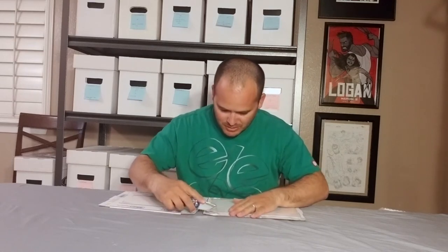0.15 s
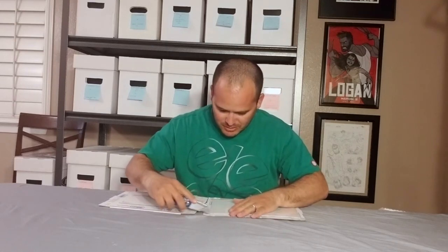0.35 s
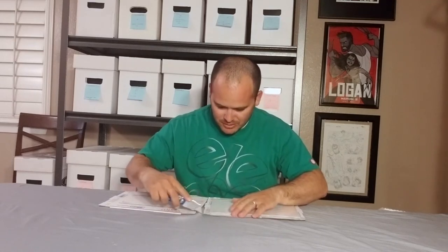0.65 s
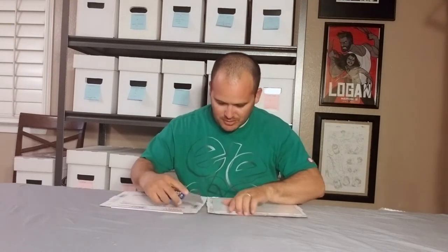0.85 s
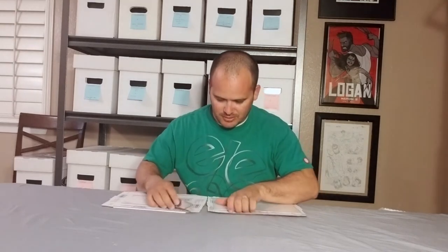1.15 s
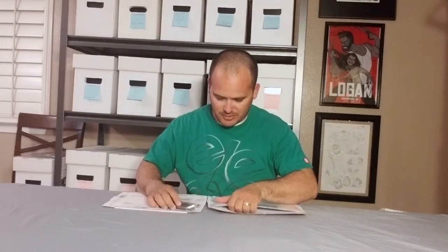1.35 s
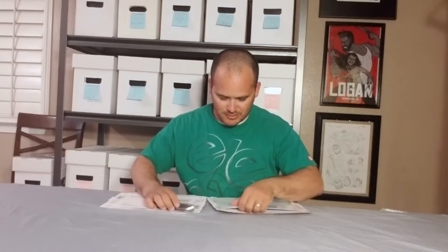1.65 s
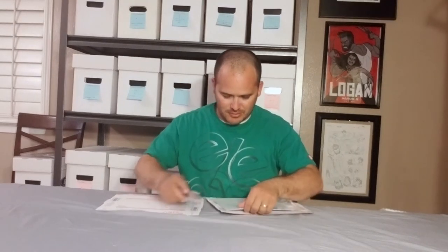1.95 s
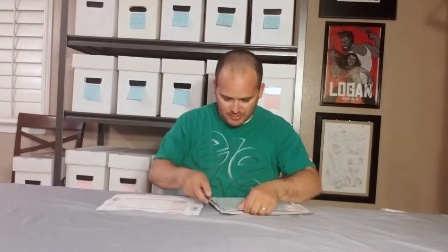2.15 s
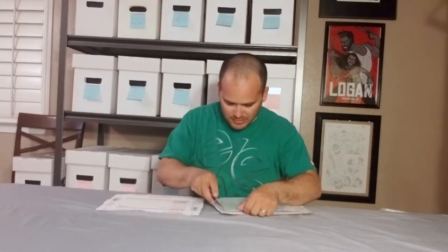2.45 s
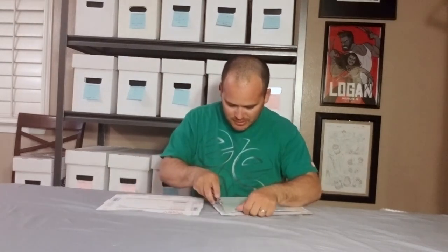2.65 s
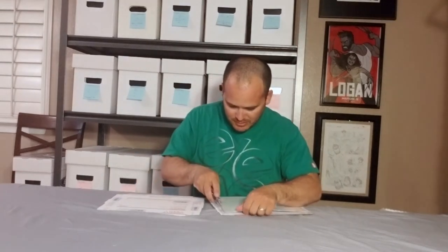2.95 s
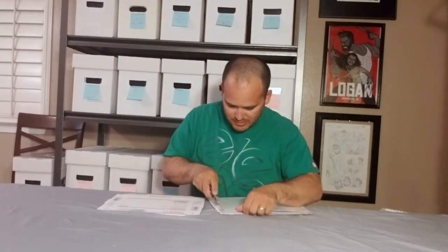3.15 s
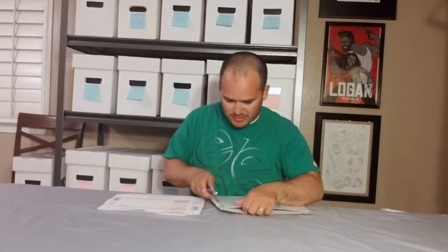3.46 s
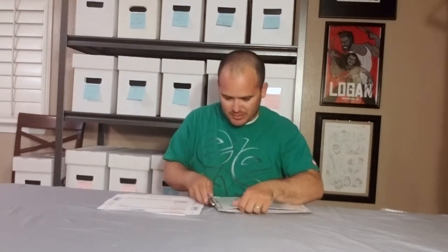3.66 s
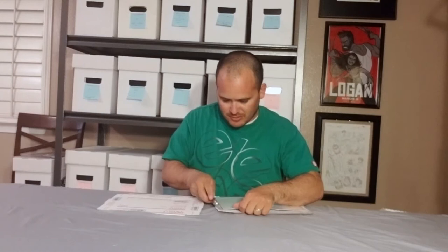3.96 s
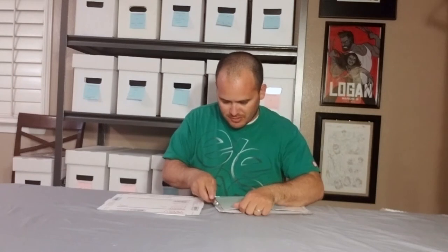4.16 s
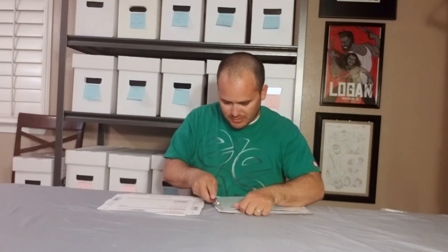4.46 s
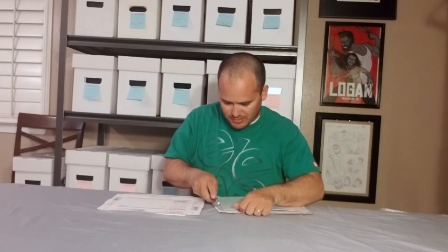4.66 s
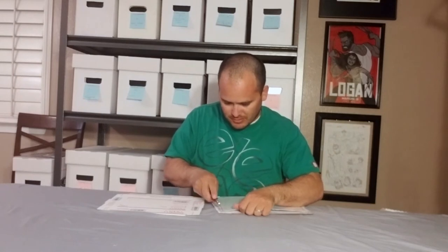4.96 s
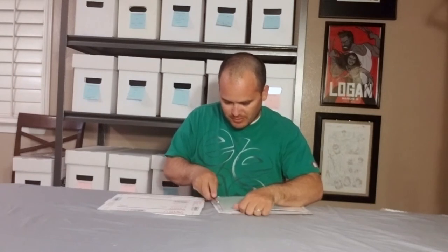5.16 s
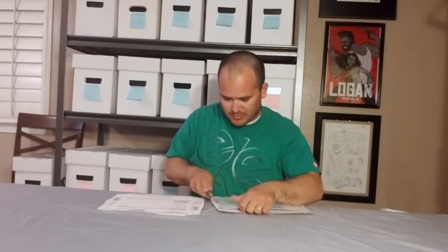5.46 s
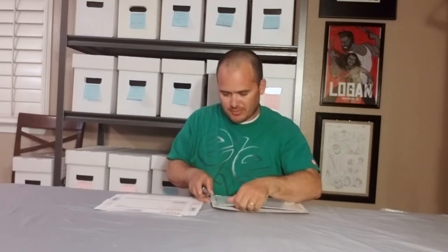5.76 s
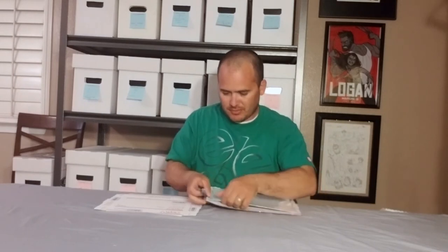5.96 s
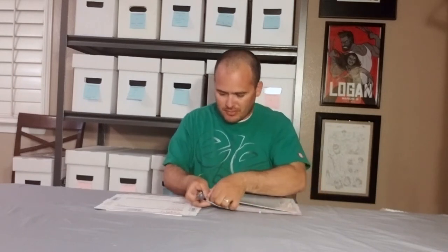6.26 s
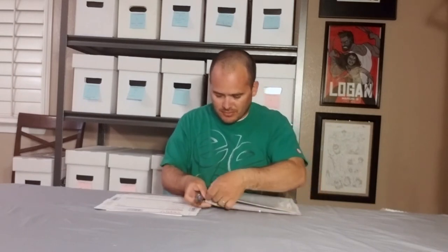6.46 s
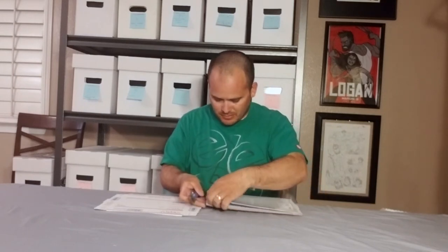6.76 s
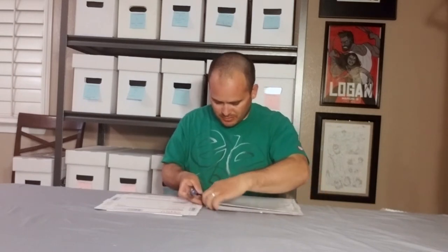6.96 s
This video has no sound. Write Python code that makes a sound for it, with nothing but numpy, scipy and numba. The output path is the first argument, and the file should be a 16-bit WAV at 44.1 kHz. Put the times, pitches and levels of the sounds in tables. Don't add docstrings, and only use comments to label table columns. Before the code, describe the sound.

A small blade rips through a paper envelope in short dry bursts, with paper snaps, rustles and dull thumps of a hollow table in a quiet room.

```python
import sys
import numpy as np
from scipy import signal
from scipy.fft import rfft, irfft
from scipy.io import wavfile
from scipy.ndimage import uniform_filter1d
from numba import njit

SR = 44100
rng = np.random.default_rng(int(sys.argv[2]) if len(sys.argv) > 2 else 0)


def ratio(d):
    e = np.asarray(d, float) / 20
    return 10 ** e


def pcm_store(signal):
    levels = np.round(np.clip(np.atleast_2d(signal), -1, 1) * 32767)
    wavfile.write(sys.argv[1], SR, levels.astype(np.int16).T)


N = 312757

# f/Hz, density/dB
AIR_SPECTRUM = [(15, -31), (25, -21.5), (74, -4.5), (130, -6.5), (211, -22.5), (299, -25), (486, -30.5),
                (527, -30), (672, -29), (1220, -33), (2030, -36), (11400, -39), (15800, -37)]
AIR_DB = -54
# f/Hz, likeness/0-1
AIR_LIKENESS = [(30, 0.95), (150, 0.82), (500, 0.22), (1500, 0.24), (4000, 0), (16000, 0.15)]
# f/Hz, width/Hz, level/dB
FAN_WHINE = [(536.3, 6.9, -75), (1193, 7.3, -80)]
# delay/s, level/dB
ECHOES = [(.0021, -9), (.0060, -5), (.0086, -10), (.0175, -13)]
HAND_MOVES = [.52, .88, 1.37, 1.62, 2.2, 2.94, 3.04, 3.12, 3.35, 4.0, 4.6, 5.1, 5.2, 5.27, 5.45, 5.75, 6.1,
              6.3, 6.55]

# f/Hz, width/Hz, level/dB
TABLE_LOW = [(114, 48, -21.5), (154, 16.7, 2.5), (179.2, 26, -6.5)]
TABLE_HIGH = [(225, 44.4, 2), (326.7, 34.5, -6), (416.4, 60, -7)]
# peak t/s, rise/s, fall/s, lowest modes level/dB, upper over lowest/dB
LOADS = [(.06, .07, .15, -57.5, -8.5), (.36, 0.074, 0.17, -31.5, -8.5), (.41, 0.074, 0.066, -32, 0),
         (.64, 0.11, 0.08, -43.5, -7), (.74, 0.077, 0.15, -42, 1.5), (1.246, 0.065, 0.3, -53.5, -3.5),
         (1.484, .08, 0.34, -54.5, -11), (1.672, 0.085, .17, -48.5, -7), (2.46, 0.25, 0.11, -53, -14),
         (2.67, 0.063, 0.21, -56, -10), (3.1, 0.25, 0.21, -31.5, -9), (3.21, .1, 0.13, -35.5, -16.5),
         (3.45, 0.034, 0.1, -44, -14.5), (3.68, 0.07, 0.085, -40, -11), (3.97, 0.32, 0.084, -51, -16),
         (4.23, 0.054, 0.1, -46, -19), (4.896, 0.21, 0.072, -52.5, -9.5), (5.2, 0.18, 0.21, -25.5, -15.5),
         (5.31, 0.19, 0.069, -30.5, -12.5), (5.43, .05, .04, -52, -20), (5.56, 0.073, 0.091, -54.5, -10.5),
         (5.82, 0.32, 0.29, -54, -12.5), (5.96, 0.063, 0.09, -67, 7.5), (7.06, 0.058, 0.22, -46.5, -16.5)]
# f/Hz, level/dB, t60/s
KNOCK_MODES = [(159, -10, .15), (182.3, -1, 0.184), (210.2, 6, 0.055), (230.5, -2.5, 0.14),
               (319.7, -9.5, 0.16), (360, -25, 0.17), (626, -12, 0.12), (944, -20, 0.051),
               (1257, -25, 0.093)]
# t/s, level/dB
LANDING = [
    (0.665, -12),
    (0.6834, -14.5),
    (0.7033, -23.5),
]
# t/s, level/dB, f/Hz, t60/s
HANDLE_TAPS = [
    (2.432, -50, 800, .15),
    (3.062, -40, 760, .1),
    (3.682, -48, 790, .1),
    (3.155, -44, 740, .07),
    (.925, -54, 620, .15),
]
# t/s, level/dB, f/Hz, t60/s, rise/s
LEANS = [
    (.315, -31.5, 105.5, 0.63, 0.04),
    (.33, -31.5, 235.4, 0.36, 0.025),
    (3.03, -34, 107.5, .5, .04),
    (1.183, -53, 399, 0.24, .01),
    (1.271, -47, 256, 0.21, 0.017),
    (2.43, -57.5, 2310, 0.19, 0.012),
    (2.851, -55, 482, 0.19, .015),
    (3.441, -44.5, 76.5, 0.42, 0.027),
    (3.66, -41.5, 182.3, .25, .02),
    (5.939, -55, 381, 0.23, .015),
]

# peak t/s, rise/s, fall/s, level/dB, f/Hz
SINGS = [(4.216, .02, .12, -61, 6300), (4.221, .04, .08, -60, 13500), (4.231, .04, .1, -64, 7400),
         (2.461, .06, .12, -61, 6700), (2.451, .05, .12, -69, 13400), (3.656, .02, .1, -54, 6250),
         (3.654, .015, .11, -48, 2500), (3.661, .02, .06, -62, 11300), (3.671, .04, .1, -63, 13800),
         (3.662, .03, .18, -60, 7400), (1.288, .003, .025, -44, 4200), (1.187, .004, .03, -49, 6000),
         (1.201, .02, .16, -53, 1250), (1.202, .03, .14, -55, 1900), (1.289, .003, .03, -46, 1700),
         (1.411, .03, .08, -52, 2000), (1.541, .05, .08, -56, 2100), (1.531, .01, .08, -58, 7400),
         (.631, .01, .06, -47, 5800), (2.852, .006, .04, -49, 6200), (2.898, .006, .05, -50, 5900),
         (2.958, .006, .04, -51, 6100), (2.986, .006, .03, -51, 6300), (3.083, .006, .03, -49, 6300),
         (4.986, .008, .06, -53, 5800), (5.187, .008, .03, -50, 5600), (5.269, .006, .03, -48, 5800),
         (6.04, .003, .015, -52, 6600), (6.206, .004, .02, -53, 6800), (6.151, .012, .14, -54, 12500),
         (6.256, .01, .04, -62, 12000), (5.939, .004, .02, -55, 5900), (.701, .03, .14, -47, 1050),
         (.702, .02, .06, -48, 690), (.746, .03, .07, -43, 270), (.721, .04, .12, -41, 345),
         (3.1, .1, .12, -51, 1000), (5.04, .008, .05, -49, 4000), (3.04, .06, .12, -53, 4000),
         (6.145, .006, .1, -49, 3600)]
# peak t/s, rise/s, fall/s, level/dB, f/Hz
MORE_SINGS = [(3.656, .015, .1, -51, 3000), (3.661, .02, .1, -63, 3800), (3.681, .04, .12, -55, 1500),
              (.681, .02, .16, -49, 3050), (.676, .01, .1, -46, 1450), (3.091, .12, .12, -58, 14300),
              (1.721, .12, .12, -61, 13000), (1.221, .04, .1, -58, 2900), (1.321, .02, .06, -57, 4100),
              (3.509, .004, .02, -58, 6200), (3.626, .004, .02, -57, 7000), (2.456, .004, .02, -59, 6900),
              (3.916, .004, .03, -67, 2400)]
# t/s, crack level/dB
CHATTER = [(3.043, -38), (3.062, -37.5), (3.098, -36.5), (3.117, -39), (3.143, -37.5), (3.012, -42),
           (3.034, -42), (3.052, -40), (3.071, -38.5), (3.128, -41), (3.163, -44), (3.178, -43.5),
           (4.996, -49), (5.052, -50), (5.122, -42), (5.151, -44), (5.196, -42), (5.3, -43), (4.988, -45.5),
           (5.108, -38.5), (5.139, -40), (5.208, -37), (5.227, -39), (5.248, -37), (5.284, -39)]
# t/s, crack level/dB, fold f/Hz, fold level/dB
RIPS = [(0.2992, -44, 3830, -7), (0.3585, -39.5, 3150, 1), (0.5771, -43.5, 3020, -7),
        (0.627, -31, 3820, -2.5), (0.9112, -57.5, 1138, 4), (1.394, -46, 1980, 0), (1.525, -44, 2100, -3),
        (1.664, -38, 2150, 2.5), (1.6906, -37, 2450, -7), (2.744, -44.5, 1710, -5), (2.7912, -37, 1730, -4),
        (2.8485, -30.5, 2820, -4.5), (2.8955, -33.5, 2410, -6.5), (2.9535, -34.5, 2570, -6.5),
        (3.002, -31.5, 2770, -3), (3.022, -30, 1950, -7), (3.079, -38, 2260, -2), (3.1883, -40, 1670, -3.5),
        (3.6441, -42.5, 2570, 4), (4.2008, -53, 2310, -1), (4.98, -40.5, 4230, -3),
        (5.034, -31.5, 3370, -3), (5.0733, -30.5, 1070, -10), (5.1638, -35, 2180, -3),
        (5.184, -33, 1070, -6), (5.2652, -36, 1200, -3), (5.3153, -37.5, 1730, 2.5),
        (5.8149, -48, 2160, -1), (5.953, -45.5, 1750, 6.5), (2.9823, -35.5, 1000, -9)]
# t/s, crack level/dB, fold f/Hz, fold level/dB, lean/dB (half of it shows as left
SLAP = [
    (0.664, -38, 3000, 6.5, -2),
]
# t/s, crack level/dB, fold f/Hz, fold level/dB, lean/dB (half of it shows as left minus
SNAPS = [(0.3913, -20, 3120, -4, 2), (0.6642, -35, 1070, 8.5, 0), (1.1857, -35, 1700, -9, 4),
         (1.2875, -33, 1880, 4, 2.0), (1.4653, -45, 2050, 3.5, 2.0), (3.2584, -60, 1720, 2, 0.5),
         (3.45, -46, 2030, -6, 3.5), (3.5418, -46, 1060, -13, 5), (5.6247, -41.5, 3830, -4, 8),
         (6.0317, -33.5, 1770, -15, 4), (6.137, -22.5, 2200, 2, 2.5), (6.2043, -34.5, 2670, -7, 4),
         (6.2456, -35.5, 2110, 0, 6), (6.3454, -63, 2560, 1, 1.5), (6.3676, -38.5, 2120, 6, 0),
         (6.5746, -54.5, 1500, 4, 1.0)]

# f/Hz, width/Hz, level/dB
SHEET = [(564, 134, 6), (814, 193, 6.5), (1070, 460, 5), (1250, 250, 4.5)]
HOLLOW = [(1676, 164, 7.5), (2600, 3260, -2), (3275, 310, 5.5)]
FIBRE = [(3860, 830, -2.5), (6250, 1620, 0), (7730, 750, 1.5)]
FINE = [(10570, 1100, -14), (11570, 2700, 0.5), (14600, 1600, -4.5)]
# t/s, f/Hz
OPENING = [(0.0, 1780), (0.35, 2460), (1.32, 1640), (1.56, 2250), (2.53, 2150), (2.74, 1710), (2.9, 2600),
           (3.34, 1600), (3.45, 2180), (4.82, 2020), (4.93, 2660), (5.41, 1910), (5.69, 2260), (5.98, 1670),
           (6.12, 2400), (6.67, 1780), (6.75, 2450), (7.09, 2000)]
# peak t/s, rise/s, fall/s, fibres level/dB, hollow over fibres/dB
CUTS = [
    (.4, 0.05, 0.11, -44, -1.5),
    (.64, 0.06, 0.076, -44.5, -4.5),
    (3.09, 0.29, 0.19, -48, 1.5),
    (5.0, 0.051, 0.2, -56.5, -0.5),
    (5.05, 0.044, 0.1, -53.5, 5.5),
    (5.17, 0.3, 0.25, -50.5, 1),
    (5.28, 0.31, 0.14, -54, 8),
]
PRESSES = [(.69, 0.019, 0.13, -54, 6.5), (.93, 0.047, 0.076, -66.5, 7), (1.2, 0.25, .1, -57.5, -3),
           (1.48, 0.044, 0.1, -60.5, -2), (2.86, 0.076, 0.055, -64, -2), (3.33, 0.087, 0.13, -74.5, 3),
           (3.47, 0.062, .06, -73.5, 7.5), (3.67, 0.069, 0.093, -60, 6.5), (5.83, 0.084, 0.14, -64.5, 1.5),
           (5.96, 0.037, 0.13, -57, 0.5), (6.69, 0.19, 0.05, -64.5, -1.5)]
FOLDS = [(.8, .1, 0.15, -60.5, -3), (.03, 0.053, 0.071, -73, 7), (1.12, 0.13, 0.21, -64, 6.5),
         (1.24, 0.16, 0.086, -56.5, 4.5), (1.3, 0.029, 0.084, -57, 4), (1.405, 0.05, 0.16, -63, 3),
         (1.72, 0.2, 0.16, -48, 2), (4.87, 0.029, 0.25, -62, -1.5), (5.84, 0.16, 0.17, -54, -2),
         (6.05, 0.16, 0.24, -57, 3.5), (6.17, 0.062, 0.14, -48.5, 4), (6.36, 0.21, 0.15, -58.5, 3),
         (6.69, 0.11, 0.22, -58, -5), (7.09, 0.18, .1, -56, 0.5)]
SKIMS = [(.22, 0.1, 0.073, -58.5, -1), (.34, 0.089, .12, -45.5, -7), (.59, 0.032, 0.087, -53, -4),
         (1.0, 0.077, 0.61, -63, -12), (1.35, 0.089, .12, -56, -15), (1.56, 0.2, .17, -54.5, -13),
         (1.79, 0.14, 0.087, -57.5, -5), (2.47, 0.11, 0.047, -66, 1.5), (2.76, 0.036, 0.26, -55, -3),
         (2.87, 0.12, 0.12, -55.5, -1), (3.47, 0.084, 0.14, -60.5, -5), (3.55, .1, 0.24, -60.5, -4),
         (4.225, .03, .09, -65, -9), (5.57, 0.14, 0.11, -57, -7), (5.64, 0.06, 0.38, -59, -6.5),
         (5.93, 0.17, 0.14, -50.5, -10), (6.2, .05, .12, -65, -12), (6.45, 0.15, 0.063, -58, -23),
         (6.85, 0.22, 0.18, -58, -9.5)]
# sheet over hollow/dB, finest fibres over fibres/dB
CUT_MIX = (-1.9, -2.9)
PRESS_MIX = (1, -10.5)
FOLD_MIX = (-16.5, -6.5)
SKIM_MIX = (-7, -6.5)

FOOT_DB = -25
RUB_ROUND, LOAD_ROUND = 1.34, 1.034
RIP_PAN_DB, TABLE_PAN_DB = 3.5, 1.1


def unit(x):
    return x / np.sqrt(np.mean(x ** 2))


def ring(x, hz, width):
    return signal.lfilter(*signal.iirpeak(min(hz, .45 * SR), hz / width, fs=SR), x)


def ring_twice(x, hz, width):
    return ring(ring(x, hz, width), hz, width)


def body(x, modes):
    out = 0
    for k, (hz, width, db) in enumerate(modes):
        out = out + (-1) ** k * ratio(db) * ring_twice(x, hz, 1.56 * width)
    return unit(out)


def walk(rate):
    hold = int(SR / rate)
    steps = np.repeat(rng.standard_normal(N // hold + 1), hold)
    return 1.24 * uniform_filter1d(uniform_filter1d(steps, hold), hold)[:N]


def grains(rate, spread_db):
    chance, size, sign = rng.random(N), rng.exponential(size=N), rng.standard_normal(N)
    return (chance < rate / SR) * ratio(spread_db * size) * sign


def swells(rows, roundness):
    t, power = np.arange(N) / SR, np.zeros((2, N))
    for s, rise_s, fall_s, db, over_db in rows:
        on = slice(max(int((s - 2 * rise_s) * SR), 0), int((s + 2 * fall_s) * SR))
        away = np.maximum((s - t[on]) / rise_s, (t[on] - s) / fall_s)
        level_db = db + FOOT_DB * away ** roundness
        power[:, on] += ratio(2 * (level_db + np.array([[0], [over_db]])))
    return power


def place(out, s, sound):
    start, laid = int(s * SR), out + np.zeros(N)
    laid[start:start + len(sound)] += sound[:N - start]
    return laid


def air():
    log_hz = np.log(np.fft.rfftfreq(N, 1 / SR) + 1)
    hz, db = np.transpose(AIR_SPECTRUM)
    colour = ratio(np.interp(log_hz, np.log(hz), db))
    hz, likeness = np.transpose(AIR_LIKENESS)
    alike = np.clip(np.interp(log_hz, np.log(hz), likeness), 0, 1)
    mid, side = (irfft(rfft(rng.standard_normal(N)) * colour * np.sqrt(1 + k * alike), N) for k in (1, -1))
    whine = sum(ratio(db) * unit(ring(rng.standard_normal(N), f, w)) for f, w, db in FAN_WHINE)
    return ratio(AIR_DB) * np.array([mid + side, mid - side]) / np.std(mid) + whine


def room(x, t60, wet_db, echo_db, pan_db, moves=HAND_MOVES):
    t = np.arange(int(.4 * SR)) / SR
    out = np.zeros((2, N + len(t)))
    edges = [0, *(int(s * SR) for s in moves), N]
    for port, side in enumerate((1, -1)):
        hiss = rng.standard_normal(len(t))
        dull = signal.lfilter(*signal.butter(2, 3300, fs=SR), hiss)
        for place_no, (a, b) in enumerate(zip(edges, edges[1:])):
            low, high = np.roll([dull, hiss - dull], shift=place_no * 877, axis=1)
            tail = low * ratio(-60 * t / t60) + high * ratio(-60 * t / (0.7 * t60))
            build_up = np.clip(t / 0.0089, 0, 1)
            reply = ratio(wet_db) * tail * build_up / np.sqrt(np.sum(tail ** 2))
            reply[0] += 1
            for k, (delay, db) in enumerate(ECHOES):
                reply[int(delay * SR) + 3 * (k + 1) * side] += ratio(db + echo_db)
            gain = ratio(side * pan_db / 2) / np.sqrt(np.sum(reply ** 2))
            out[port, a:b + len(t) - 1] += signal.fftconvolve(x[a:b], reply) * gain
    return out[:, :N]


def placed(pair, *space):
    left, right = pair
    return room((left + right) / 2, *space) + np.array([left - right, right - left]) / 2


def drumming():
    low_level, high_level = np.sqrt(swells(LOADS, LOAD_ROUND))
    shake = grains(400, 1.4)
    low = body(shake, TABLE_LOW)
    low = unit(low / (uniform_filter1d(low ** 2, size=600) + .05) ** 0.23)
    return low_level * low + high_level * body(shake, TABLE_HIGH)


def struck(db, hz, t60, rise_s):
    t = np.arange(SR // 2) / SR
    return ratio(db - 60 * t / t60) * np.sin(2 * np.pi * hz * t) * (1 - np.exp(-t / rise_s))


def knock():
    hand = sum(struck(db, hz, t60, 1.0 / hz) for hz, db, t60 in KNOCK_MODES)
    hand = signal.lfilter(*signal.butter(2, 70, "high", fs=SR), hand)
    out = 0
    for s, db in LANDING:
        out = place(out, s, -ratio(db) * hand / np.abs(hand).max())
    for s, *tap in HANDLE_TAPS:
        out = place(out, s, struck(*tap, 0.00046))
    for s, *lean in LEANS:
        out = place(out, s, struck(*lean))
    return out


def singing():
    out = np.zeros(N)
    t = np.arange(SR // 2) / SR - .15
    for s, rise_s, fall_s, db, hz in SINGS + MORE_SINGS:
        band = unit(ring_twice(rng.standard_normal(len(t)), hz, 0.18 * hz))
        swell = ratio(db + FOOT_DB * np.maximum(-t / rise_s, t / fall_s))
        out = place(out, s + t[0], band * swell)
    return out


def tears(count):
    t = np.arange(1500) / SR
    peak_s, width_s = 0.0036, 0.0037
    return rng.standard_normal((count, len(t))) * np.exp(-((t - peak_s) / width_s) ** 2)


def crack_and_fold(events, pushes, gain_db, crack_width):
    out = np.zeros((2, N + SR))
    for (s, db, hz, fold_db, pan_db), push in zip(events, pushes):
        fold = ring_twice(push, hz, 0.65 * hz)
        crack = ring_twice(push, 6030, crack_width) + 0.37 * ring(push, 10760, 4100)
        sound = ratio(fold_db) * fold / np.abs(fold).max() + crack / np.abs(crack).max()
        lean_db = np.array([[pan_db], [-pan_db]]) / 4
        out[:, int(s * SR):int(s * SR) + len(push)] += ratio(db + gain_db + lean_db) * sound
    return out[:, :N]


def chatter():
    fold_hz, fold_db = 2200, -4.5
    jumps = [(*jump, fold_hz, fold_db, RIP_PAN_DB) for jump in CHATTER]
    return crack_and_fold(jumps, tears(len(jumps)), 4.7, 4800)


def rips():
    events = [(*rip, RIP_PAN_DB) for rip in RIPS] + SLAP
    return crack_and_fold(events, tears(len(events)), 3.5, 4100)


def snaps():
    t = np.arange(1500) / SR
    sudden = np.tile(np.exp(-t / .00003), (len(SNAPS), 1))
    thin = signal.butter(2, 800, "high", fs=SR, output="sos")
    cracks = signal.sosfilt(thin, crack_and_fold(SNAPS, sudden, 9.15, 4940))
    return np.roll(cracks, shift=30, axis=1)


@njit
def glide(x, hz, sharp):
    y, b, l = np.empty(len(x)), 0., 0.
    for i in range(len(x)):
        g = np.tan(np.pi * hz[i] / SR)
        v = (b + g * (x[i] - l)) / (1 + g * (g + 1 / sharp))
        b, l, y[i] = 2 * v - b, l + 2 * g * v, v
    return y


def rubbing():
    fold_hz = np.interp(np.arange(N) / SR, *np.transpose(OPENING))
    power = 0
    touches = ((CUTS, CUT_MIX), (PRESSES, PRESS_MIX), (FOLDS, FOLD_MIX), (SKIMS, SKIM_MIX))
    for rows, (sheet_db, fine_db) in touches:
        fibres, fold = swells(rows, RUB_ROUND)
        power = power + np.array([fibres, fold, fold * ratio(2 * sheet_db), fibres * ratio(2 * fine_db)])
    jerk = walk(110)
    stutter = ratio(3.1 * (jerk - uniform_filter1d(jerk, size=2000)))
    low, high = (grains(8000, 2.02) * stutter for _ in range(2))
    sharp = 3.0
    fold = glide(glide(low, fold_hz, sharp), fold_hz, sharp)
    hollow = unit(unit(fold) + ratio(0.5) * body(low, HOLLOW))
    parts = body(high, FIBRE), hollow, body(low, SHEET), body(high, FINE)
    return sum(level * ratio(2.56 * walk(30)) * part for level, part in zip(np.sqrt(power), parts))


def ports(pair):
    wider_db, right_shine_db = 1.2, 2
    left, right = pair
    side = (left - right) / 2
    extra = (ratio(wider_db) - 1) * signal.lfilter(*signal.butter(1, 900, "high", fs=SR), side)
    shine = (ratio(right_shine_db) - 1) * ring(right, 13400, 4300)
    return np.array([left + extra, right - extra + shine])


def scene():
    torn = rips()
    paper = placed(snaps(), 0.31, -0.15, 0.098, 1.1) + room(rubbing(), 0.15, 3.0, -25.0, 1.9)
    table = room(drumming() + knock(), 0.2, -14.5, -13.5, TABLE_PAN_DB, [])
    background = air()
    paper = paper + placed(torn + chatter(), 0.35, -1.5, -3.5, 1.1)
    paper = paper + room(singing(), 0.12, -2.2, -10, 1.6)
    paper[0] = np.roll(paper[0], 1)
    return ports(paper) + table + background


def low_pass(x):
    return signal.sosfilt(signal.butter(12, 16640, fs=SR, output="sos"), x)


def record(dry):
    top_cut = signal.ellip(10, .2, 70, 15780, fs=SR, output="sos")
    return low_pass(signal.sosfilt(top_cut, dry))


dry = scene()
out = record(dry)
pcm_store(out)
```